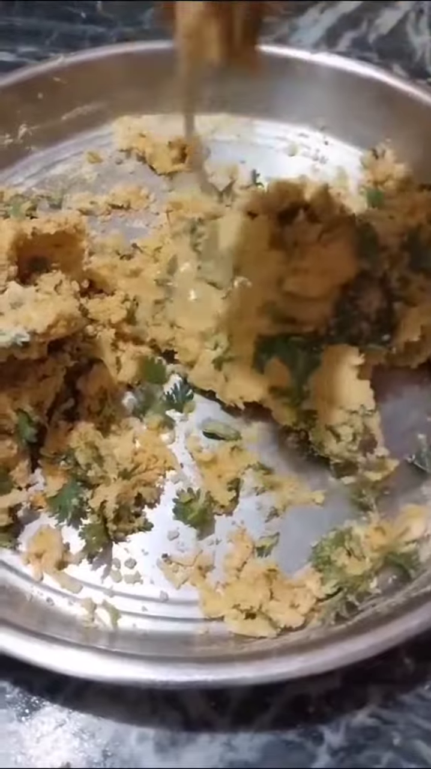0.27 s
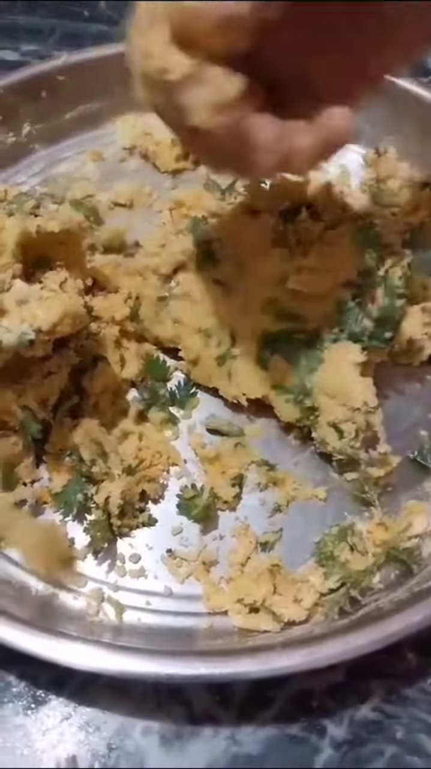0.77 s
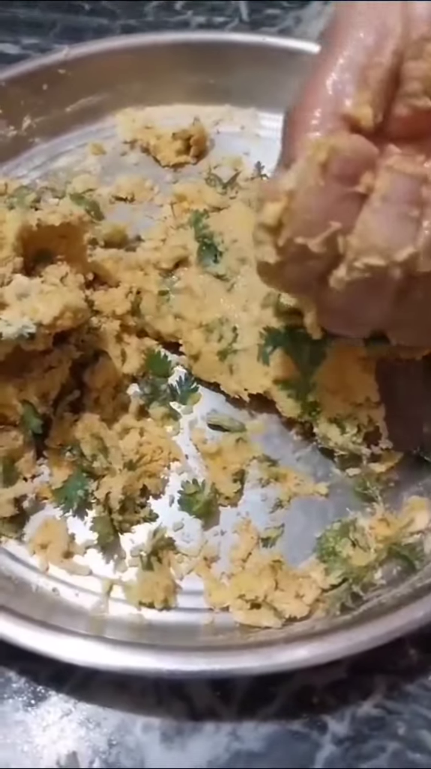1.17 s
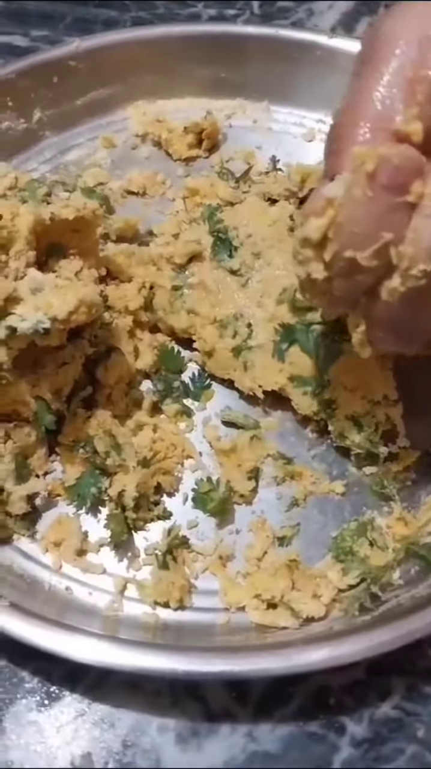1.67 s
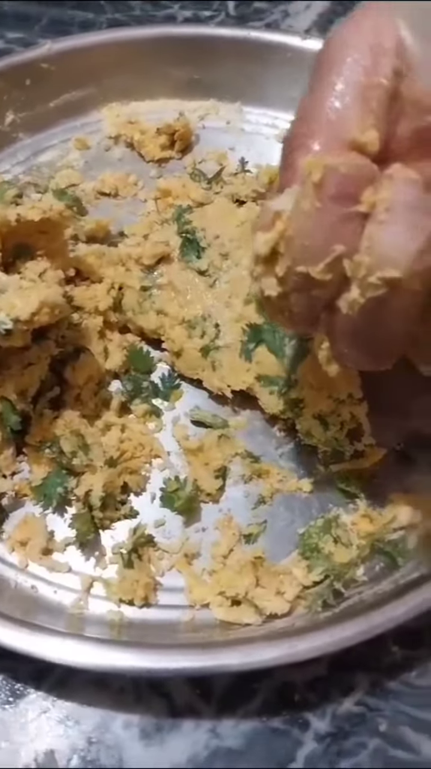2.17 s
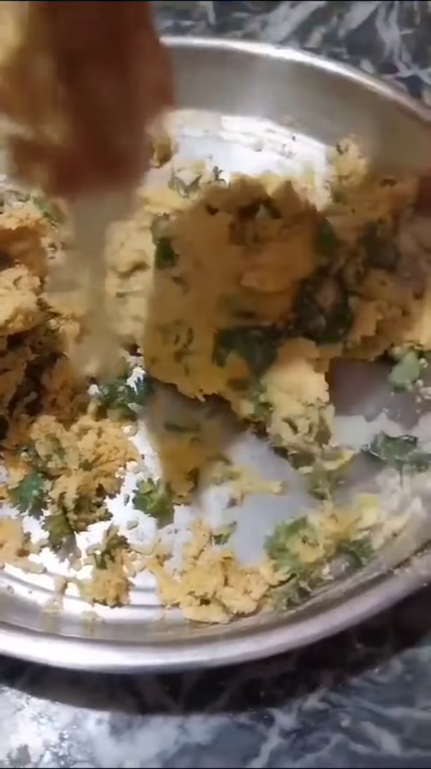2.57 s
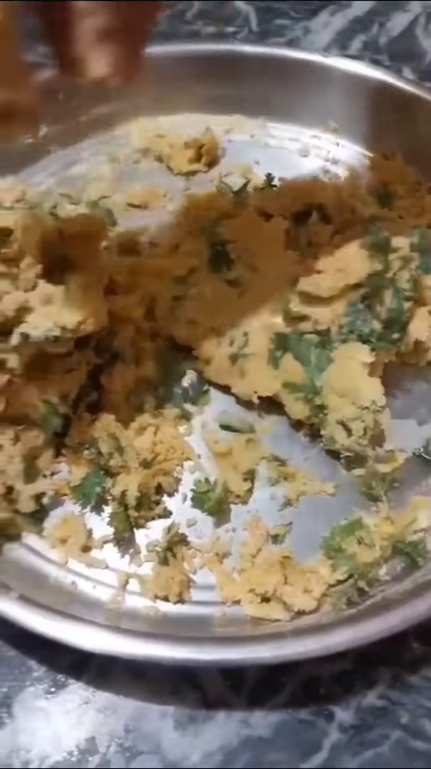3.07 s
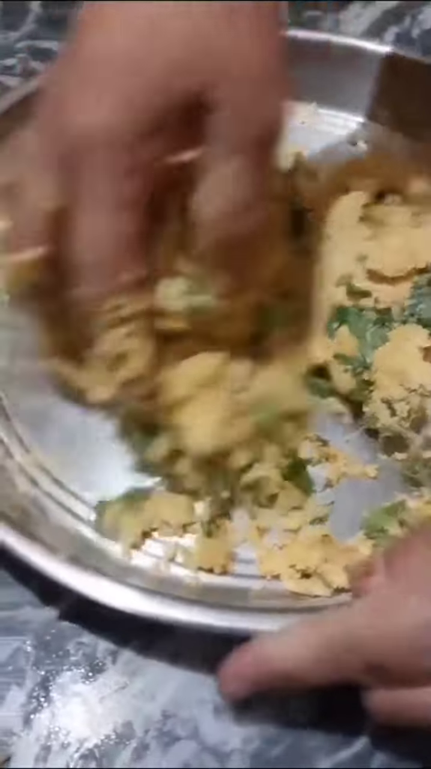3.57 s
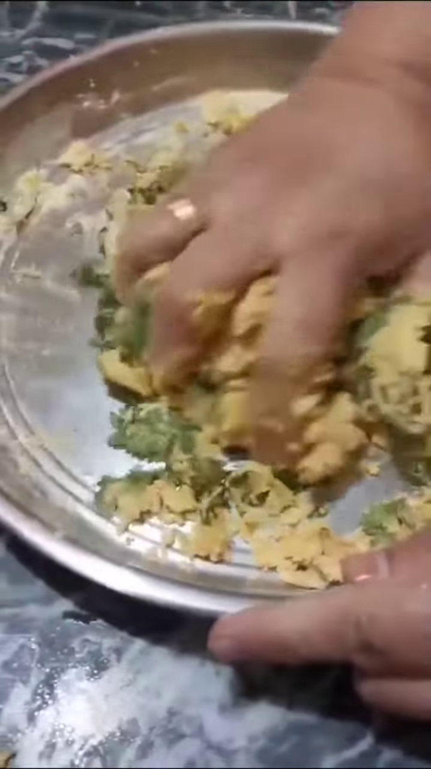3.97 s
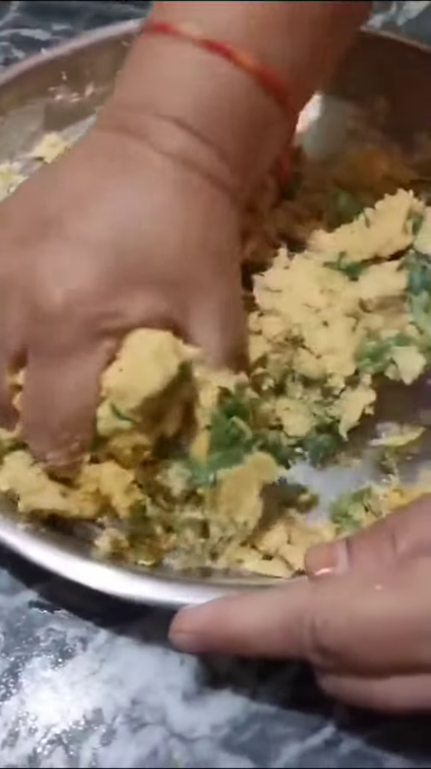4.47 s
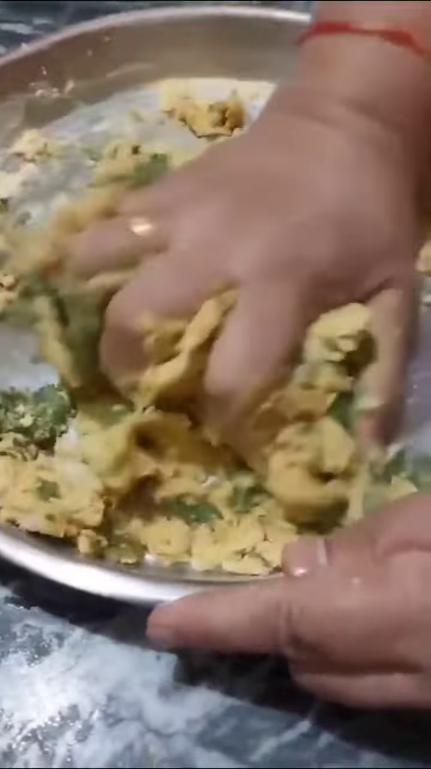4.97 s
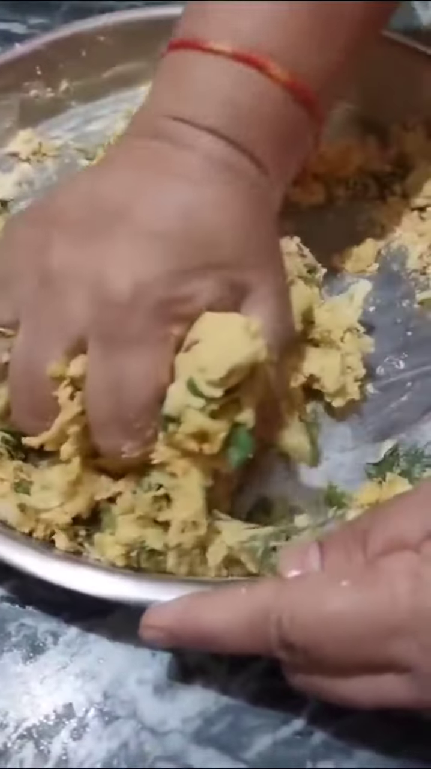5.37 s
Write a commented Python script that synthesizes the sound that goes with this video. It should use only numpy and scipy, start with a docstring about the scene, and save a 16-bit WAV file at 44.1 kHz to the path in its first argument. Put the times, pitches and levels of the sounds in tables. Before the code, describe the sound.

Grainy dough mixing on a metal plate: soft crunches, a thud with small rattles, a bright scrape, then kneading, above a steady appliance hum.

```python
"""In a kitchen, a hand works a crumbly flour dough on a steel plate that stands on a stone counter.
Strokes are grainy noise: the dough rubs, crumbs break and crackle, and a brisk scrape stirs the steel.
The plate is a set of ringing modes: it takes one hard knock, judders, rocks and is bumped softly.
A motor hums and whines as multiples of a wandering turning speed, over steady whirr and room air.
A faint far squeal and a short faint whistle are thin, fluttering tones."""
import sys
import numpy as np
from scipy import signal
from scipy.fft import rfft, irfft, next_fast_len
from scipy.io import wavfile
from scipy.ndimage import uniform_filter1d

SR = 44100
rng = np.random.default_rng(int(sys.argv[2]) if len(sys.argv) > 2 else 0)


def unload_audio(sound):
    """Save the sound as a 16-bit wav file, at the path given as the first command line argument."""
    columns = np.transpose(np.atleast_2d(sound))
    # keep every value between -1 and 1, then stretch to whole-number steps
    steps = np.round(np.clip(columns, -1, 1) * 32767)
    wavfile.write(sys.argv[1], SR, steps.astype(np.int16))


N = 247401
TIME = np.arange(N) / SR


def from_db(db):
    """Turn decibels into gain."""
    return 10 ** (np.asarray(db) / 20)


def rms_one(x):
    """Scale a sound to an rms level of 1."""
    return x / np.sqrt(np.mean(x ** 2) + 1e-20)


def in_time(rows):
    """Read each column of a table at every sample, with straight lines between the rows."""
    seconds, *columns = np.transpose(rows)
    return [np.interp(TIME, seconds, column) for column in columns]


def at_hz(points, hz):
    """Read a table of frequencies on a logarithmic frequency axis."""
    table = np.array(points)
    return np.interp(np.log(hz + 1), np.log(table[:, 0]), table[:, 1])


def pan(db):
    """Left and right gains for a level difference; above 0 dB the left is louder."""
    return from_db(np.array([[db], [-db]]) / 2)


def drift(rate_hz):
    """Slow random wandering with rms 1: noise smoothed twice, with poles at the given rate."""
    step = 40  # samples between the computed points
    pole = np.exp(-2 * np.pi * step * rate_hz / SR)
    noise = rng.standard_normal(N // step + 2002)
    slow = signal.lfilter([1], [1, -2 * pole, pole * pole], noise)[2000:]  # skip the filter's start
    return np.interp(np.arange(N) / step, np.arange(len(slow)), rms_one(slow))


# how alike the noise is at the two ears: (frequency [Hz], likeness [0-1])
LIKENESS = [(30, 1), (120, 0.34), (260, 0.4), (500, 0.3), (1000, 0), (2000, 0), (4000, 0), (8000, 1),
            (13000, 0.92)]


def coloured(spectrum, texture=1):
    """Stereo noise, shaped in time by a texture and then by a smooth spectrum, with rms 1."""
    size = next_fast_len(N)
    hz = np.arange(size // 2 + 1) * SR / size
    mid, side = rfft(rng.standard_normal((2, N)) * texture, size)
    alike = np.minimum(at_hz(LIKENESS, hz), .99)
    both = np.sqrt(1 + alike) * mid + np.sqrt(1 - alike) * side * [[1], [-1]]
    return rms_one(irfft(both * from_db(at_hz(spectrum, hz)), size)[:, :N])


def resonate(x, hz, width_hz):
    """Pass a sound through one resonance whose gain at the top is 1."""
    return signal.lfilter(*signal.iirpeak(hz, hz / width_hz, fs=SR), x)


def add(track, s, sound):
    """Mix a sound into a track at a time in seconds."""
    start = int(s * SR)
    track[..., start:start + sound.shape[-1]] += sound[..., :N - start]


def gate(start, length, attack_s, release_db_per_s):
    """An envelope that rises, holds and dies away."""
    age = TIME - start
    return np.clip(age / attack_s, 0, 1) * from_db(-release_db_per_s * np.maximum(age - length, 0))


def grains(per_s, spread_db, grain_s, smooth_share, clump_db):
    """Tiny fractures of uneven size come in clumps over a smooth sliding hiss."""
    born = rng.random(N) < per_s * from_db(clump_db * drift(25)) / SR
    sizes = from_db(spread_db * np.minimum(rng.exponential(1, N), 4))
    fading = [1, -np.exp(-1 / (grain_s * SR))]
    power = signal.lfilter([1], fading, born * sizes ** 2 + 1e-18)
    return np.sqrt(power / power.mean() + smooth_share)


def shifting(x, patchy_db):
    """The contact keeps changing, so each third of an octave swells and fades on its own."""
    size = next_fast_len(N)
    hz = np.arange(size // 2 + 1) * SR / size
    thirds = 3 * np.log2(np.clip(hz, 1000, 16000) / 1000)
    spectrum, out = rfft(x, size), 0
    for band in range(13):
        gain = from_db(patchy_db * drift(13))
        share = np.maximum(0, 1 - np.abs(thirds - band))
        out = out + rms_one(gain) * irfft(spectrum * share, size)[:, :N]
    return out


def thin_tone(phase):
    """A tone that flutters in level and wavers in phase, differently at each ear."""
    waver = .7 * drift(18) + .5 * np.array([drift(12), drift(12)])
    return from_db(1.5 * drift(25)) * np.sin(phase + waver)


def struck(modes, pitch=1):
    """Modes ring after a soft contact, each a little different on every blow."""
    t = TIME[:SR // 3]
    rings = 0
    for hz, db, t60 in modes:
        gain = from_db(db + rng.normal(0, 2.2) - 60 * t / t60)
        rings = rings + gain * np.sin(2 * np.pi * pitch * hz * rng.normal(1, .01) * t)
    return rings * (1 - np.exp(-t / .0052))


def kitchen(x, t60_s):
    """A short diffuse echo tail, different at each ear, dulled by the walls."""
    t = TIME[:SR // 2]
    tail = rng.standard_normal((2, len(t))) * from_db(-60 * t / t60_s) * (t > .004)
    tail = signal.sosfilt(signal.butter(1, 6000, fs=SR, output="sos"), tail)
    return signal.fftconvolve(x, tail / np.sqrt(np.sum(tail ** 2) / 2), axes=1)[:, :N]


# motor speed: (time [s], speed [turns/s])
SPEED = [(0, 25), (.4, 24.2), (.7, 24.3), (1.05, 25.4), (1.35, 25.6), (1.94, 26.4), (2.6, 26.3),
         (3.3, 26.8), (4.5, 25.4), (5.61, 25.6)]
# the hum's two main lines, in two parts, the sixth before a lift:
# (time [s], level of 5th order [dB], level of 6th order [dB])
HUM = [
    [(0.0, -54.5, -45.5), (0.18, -49.5, -42.5), (0.91, -38.5, -47.5), (1.9, -37, -54.5), (2.02, -36, -50.5),
     (2.3, -37.5, -57), (2.42, -36, -91), (2.55, -37, -57)],
    [(2.95, -38, -56), (3.23, -36, -42.5), (3.9, -59, -65), (4.28, -52.5, -63), (4.45, -41.5, -67),
     (4.68, -39.5, -52), (5.35, -46.5, -59.5), (5.61, -49, -48)],
]
# shared level of the weaker orders: (time [s], level [dB])
OVERTONES = [(0, -41.5), (.9, -40), (1.6, -35), (2.5, -37), (3.2, -34), (3.9, -54.5), (4.7, -45.5),
             (5.61, -50)]
# the casing's response to the weaker orders: (frequency [Hz], gain on their shared level [dB])
CASING = [(52, -31.5), (76, -22.5), (103, -27), (178, -13), (186, -11.5), (208, -17), (236, -17.5),
          (262, -35), (290, -24.5), (318, -31.5), (340, -18.5), (365, -39.5)]
# the thin whine: (time [s], level of 36th order [dB], level of 40th order [dB])
WHINE = [(0, -79, -74), (.9, -72, -76), (1.3, -72, -77), (1.699, -68.5, -69), (1.95, -74.5, -79.5),
         (2.3, -68, -83), (2.7, -83.5, -88), (3.0, -62, -79), (3.15, -80, -85), (3.7, -99, -104)]
# spectra of the low noise under the hum: (frequency [Hz], relative level [dB])
DRONE = [(60, -6.5), (110, 15.5), (160, 7.5), (210, 11), (270, 8.5), (335, 2), (400, -22), (510, -5.5),
         (700, -53)]
RUMBLE = [(15, -43), (30, 27), (50, 40), (80, 40.5), (120, 41.5), (250, -35.5)]


def motor():
    """Neighbouring orders (multiples) of the turning speed beat once a turn, so the hum throbs."""
    speed, = in_time(SPEED)
    fifth_db, sixth_db = in_time(np.vstack(HUM))
    unsteady = np.interp(TIME, [2.7, 3.6], [.04, .45])  # the hum wavers more later on
    turn = 2 * np.pi * np.cumsum(speed) / SR
    fifth = from_db(fifth_db + 6.5 * unsteady * drift(15.4))
    sixth = from_db(sixth_db + 3.5 + 5 * unsteady * drift(12))
    hum = fifth * np.cos(5 * turn + unsteady * drift(6))
    hum += sixth * np.cos(6 * turn + unsteady * drift(6))
    overtones = from_db(in_time(OVERTONES)[0])
    for order in (2, 3, 4, 7, 8, 9, 10, 11, 12, 13, 14):
        gain = overtones * from_db(at_hz(CASING, order * speed) + 1.5 * drift(3))
        # the casing delays each order differently, which keeps the hum round instead of buzzy
        lag = order ** 2 * np.pi / 7 + .25 * drift(5)
        hum += gain * np.cos(order * turn + lag + 2 * unsteady * drift(3))
    whine = 0
    for order, db in zip((36, 40), in_time(WHINE)):
        whine = whine + from_db(db + 2 * drift(4)) * thin_tone(order * turn + 3 * drift(1.5))
    # the drone is -54 dB when the main lines are at -43 dB, and shares part of their swing
    drone_gain = from_db(-54) * (np.hypot(fifth, sixth) / from_db(-43)) ** .15
    drone = drone_gain * (coloured(DRONE) + from_db(-6.5) * coloured(RUMBLE))
    return np.sqrt(2) * (hum + whine) + drone


# motor whirr in the casing, before the sink: (frequency [Hz], width [Hz], level [dB])
WHIRR = [(945, 120, -79), (2500, 500, -75), (5100, 300, -80)]
# spectrum of the room air: (frequency [Hz], relative level [dB])
AIR = [(240, -3), (440, 16.5), (600, 5), (800, 4.5), (1300, -9.5), (2000, -21), (2700, 0), (3100, -8.5),
       (4900, -11.5), (5700, -39), (7800, -16), (8700, -32), (15500, -38.5)]


def background():
    """The motor's whirr is noise in broad resonances, over the noise of the room air."""
    whirr = 0
    for hz, width, db in WHIRR:
        noise = rng.standard_normal((2, N))
        whirr = whirr + from_db(db) * rms_one(resonate(resonate(noise, hz, width), hz, width))
    sink_db = np.interp(TIME, [3.2, 3.7], [0, -5])
    return from_db(sink_db) * (whirr + from_db(-64.5) * coloured(AIR))


# a faint, far squeal: (time [s], pitch [Hz], level [dB])
SQUEAL = [(0, 652, -74), (.05, 660, -68), (.14, 672, -66), (.19, 676, -57), (.228, 672, -56.5),
          (.27, 674, -55), (.3, 672, -55.5), (.35, 666, -71.5), (.47, 671, -71), (.65, 665, -80)]
# its partials: (ratio to the pitch [1], level [dB])
SQUEAL_PARTIALS = [(1.001, -14.5), (1.341, -10.5), (2, 0), (3, -7), (3.999, -3), (6, -10)]


def squeal():
    """The partials share a gliding pitch, waver in level on their own and leave an echo."""
    hz, level_db = in_time(SQUEAL)
    phase = 2 * np.pi * np.cumsum(hz) / SR
    tone = sum(from_db(db + 2 * drift(14)) * thin_tone(ratio * phase) for ratio, db in SQUEAL_PARTIALS)
    direct = from_db(level_db) * (TIME < SQUEAL[-1][0]) * tone
    return direct + from_db(-4.5) * kitchen(direct, t60_s=.32)


# strokes of the hand in the dough:
# (start [s], length [s], rub on steel [dB], crunch [dB], fine crumbs [dB])
STROKES = [(-0.007, 0.39, -59, -65.5, -72), (0.42, 0.23, -65.5, -69, -67.5), (0.527, 0.025, -69, -60, -58),
           (0.846, 0.2, -63.5, -72.5, -88), (2.385, 0.023, -64, -54, -61.5),
           (2.542, 0.13, -66.5, -58, -63.5), (2.712, 0.079, -48.5, -51, -64.5),
           (2.814, 0.023, -72, -53.5, -59.5), (2.864, 0.17, -66.5, -68.5, -79),
           (3.262, 0.49, -71, -61.5, -67), (3.416, 0.092, -84, -51.5, -51), (3.789, 0.36, -70, -58, -58),
           (4.175, 0.16, -77, -60, -58.5), (4.286, 0.14, -60, -73, -75), (4.444, 0.14, -64.5, -57, -54),
           (4.602, 0.58, -98, -62.5, -59), (4.984, 0.067, -85, -53.5, -56.5),
           (5.215, 0.27, -63, -71.5, -70.5), (5.368, 0.21, -63, -55.5, -55),
           (5.491, 0.089, -75, -57.5, -49.5)]
# spectra of the three layers: (frequency [Hz], relative level [dB])
RUB = [(350, -63.5), (600, 8.5), (900, -4.5), (1250, 6), (1850, 4.5), (2450, 5.5), (3100, -27)]
CRUNCH = [(1200, -26), (1900, -8.5), (2400, 0.5), (2850, -1.5), (3400, -1), (4400, 0), (5700, -4),
          (7000, -1.5), (9500, -23)]
CRUMBS = [(5500, -15), (7800, 1.5), (9500, -4), (11000, 2), (12400, 3), (13600, 0), (15500, -3.5)]


def dough():
    """With each stroke the lump rubs on the steel, coarse crumbs break and fine ones crackle."""
    # under the strokes the fingers keep squeezing lightly: rub, crunch, fine crumbs [dB]
    power = from_db([[-68.5], [-75], [-92]]) ** 2
    for start, length, *levels_db in STROKES:
        attack_s = .035 + .075 * length  # long strokes swell more slowly
        stroke = gate(start, length, attack_s, release_db_per_s=219)
        power = power + np.outer(from_db(levels_db), stroke) ** 2
    rub_gain, crunch_gain, crumbs_gain = np.sqrt(power)
    rubbing = grains(per_s=140, spread_db=-15.5, grain_s=.01, smooth_share=.4, clump_db=.5)
    breaking = grains(per_s=560, spread_db=2, grain_s=.0034, smooth_share=.23, clump_db=3.5)
    crackle = grains(per_s=900, spread_db=3, grain_s=.0005, smooth_share=.6, clump_db=3.5)
    rub = rub_gain * coloured(RUB, rubbing)
    crunch = crunch_gain * coloured(CRUNCH, breaking)
    crumbs = crumbs_gain * coloured(CRUMBS, crackle)
    contact = (rub + crunch) * pan(db=-4.5) + crumbs * pan(db=-2.5)
    return shifting(contact, patchy_db=2.6)


# fingers and crumbs tick on the steel:
# (time [s], peak before a common cut [dB], centre [Hz], left over right [dB])
TICKS = [(0.0562, -27.5, 1600, 9), (2.4112, -28.5, 2950, -9), (2.552, -32.5, 7140, -3.5),
         (2.5782, -36.5, 3740, -12), (2.612, -28.5, 7593, -3), (2.6557, -28, 2300, -19.5),
         (2.716, -37.5, 1380, -23), (3.237, -44, 1090, -9), (4, -28, 4200, -11), (4.003, -29.5, 4200, -14),
         (4.02, -19, 12500, -17), (4.0592, -8, 12300, -22), (4.086, -10, 11850, -23),
         (4.122, 3, 12900, -10), (4.1252, -4, 12700, -20), (4.1377, -6, 12600, -5), (4.153, -18.5, 5203, 2),
         (4.168, -19.5, 5230, 0), (4.3298, -23.5, 2340, -6), (4.997, -29, 2400, -4),
         (5.22, -42.5, 1630, -5)]


def ticks():
    """A sharp contact and a short rustle in one broad resonance; low ticks last longer."""
    out, t = np.zeros((2, N)), TIME[:SR // 6]
    for s, peak_db, hz, side_db in TICKS:
        cycles = t * hz
        shape = np.exp(-cycles / 5) + from_db(-15) * np.exp(-cycles / 45)
        shared, own = rng.standard_normal(len(t)), rng.standard_normal((2, len(t)))
        contact = (shared + .59 * own) * shape
        tick = resonate(resonate(contact, hz, hz * .59), hz, hz * .76)
        add(out, s, from_db(peak_db - 8.5) * tick / np.abs(tick).max() * pan(db=side_db))
    return out


# clumps of dough crumble onto the steel:
# (time [s], length [s], level [dB], centre [Hz], spread to each side [octaves], left over right [dB])
CRUMBLES = [(0.06, 0.018, -55, 1440, 0.45, -3), (0.556, 0.012, -65, 2106, .3, -11),
            (2.41, 0.018, -51, 2630, 0.17, -4), (2.411, 0.011, -53, 6740, 0.086, 5),
            (2.458, .01, -59, 4640, 0.13, -2), (2.71, 0.008, -50.5, 2710, 0.8, -9),
            (2.754, 0.0082, -49.5, 4940, 0.15, -7), (2.766, 0.018, -48, 3000, 0.39, -13),
            (2.797, 0.0044, -54, 3350, 0.72, -7), (2.821, 0.013, -46.5, 3260, 0.61, -5),
            (4.349, .065, -60.5, 1390, 0.46, -1), (4.484, 0.035, -56.5, 5530, 0.42, 0),
            (4.773, .012, -62, 4605, 0.34, 2), (5.082, 0.021, -48, 6250, 0.21, -2)]


def crumbles(count):
    """A clump breaks in a quick run of tiny cracks, which ring briefly at several pitches."""
    out, t = np.zeros((2, N)), TIME[:SR // 8]
    cracks_per_s = 1400  # shared among the pitches
    for s, length, level_db, centre_hz, octaves, side_db in CRUMBLES:
        burst = 0
        places = np.linspace(-1, 1, count) + rng.normal(0, .15, count)
        for hz in centre_hz * 2 ** (octaves * places):
            happens = rng.random(len(t)) < cracks_per_s / count / SR
            cracks = happens * rng.standard_normal((2, len(t))) + 1e-18
            burst = burst + resonate(resonate(cracks, hz, hz * .13), hz, hz / 2) / np.sqrt(hz)
        fade = from_db(level_db - 800 * np.maximum(t - length, 0))  # falls 800 dB per s
        add(out, s, fade * rms_one(burst) * pan(db=side_db))
    return out


# the lump drags over the steel and the rub rises in pitch:
# (start [s], length [s], first pitch [Hz], last pitch [Hz], level [dB])
DRAGS = [(4.436, .16, 1503, 2400, -67), (4.84, 0.15, 2226, 3015, -63.5), (5.0, 0.11, 3330, 5580, -59),
         (5.231, 0.26, 1203, 2494, -61.5), (0.818, 0.159, 627, 694, -60.5), (5.439, 0.18, 3313, 4400, -62)]


def drags():
    """Each drag is a grainy band of friction that swells, fades and glides upward."""
    out = np.zeros((2, N))
    grit = grains(per_s=300, spread_db=2.2, grain_s=.002, smooth_share=.3, clump_db=2.5)
    for start, length, first_hz, last_hz, level_db in DRAGS:
        progress = np.clip(TIME[:SR // 2] / length, 0, 1)
        phase = 2 * np.pi * np.cumsum(first_hz * (last_hz / first_hz) ** progress) / SR
        lowpass = signal.butter(2, first_hz * .38, fs=SR, output="sos")
        a, b = signal.sosfilt(lowpass, rng.standard_normal((2, 2, len(phase))))
        # two slow noises on a cosine and a sine make a band around the gliding pitch
        band = rms_one(a * np.cos(phase) + b * np.sin(phase))
        add(out, start, from_db(level_db) * np.sin(np.pi * progress) * band)
    return out * rms_one(grit) * pan(db=-5)


# one faint whistle: (start [s], length [s], pitch [Hz], slide [Hz/s], level [dB])
WHISTLE = (0.9, 0.15, 2439, -330, -62)


def whistle():
    """A thin tone swells and fades while its pitch sags."""
    start, length, hz, slide, level_db = WHISTLE
    age = np.clip(TIME - start, 0, length)
    phase = 2 * np.pi * np.cumsum(hz + slide * age) / SR
    return from_db(level_db) * np.sin(np.pi * age / length) * thin_tone(phase)


# high plate modes, damped by the dough: (frequency [Hz], level [dB], time to fall 60 dB [s])
CLANK = [(649, 6.5, 0.021), (744, 1.5, 0.034), (988, -7, 0.074), (1047, -1, 0.055), (1215, -7, 0.11),
         (1470, -8.5, 0.11), (2570, 9.5, 0.014), (3160, -7, 0.026)]


def clank():
    """The steel's high modes reach each ear with different strengths."""
    return np.array([struck(CLANK), struck(CLANK)]) * pan(db=-3.5)


# plate knocks and rocks on the counter:
# (time [s], force [dB], body ring [dB], upper body ring [dB], body pitch [Hz])
KNOCKS = [(2.6564, -9.5, -47, -20, 237.2), (2.752, -27.5, -40, -54, 241), (2.768, -26.5, -44, -49, 240),
          (2.792, -32.5, -51, -52, 230), (2.837, -28, -32.5, -47, 250), (2.921, -36, -27.5, -38.5, 259),
          (3.014, -39, -32, -44, 244), (3.034, -32.5, -35.5, -50, 325), (3.149, -36, -28, -39, 275.9),
          (3.174, -43, -51, -47, 285), (3.235, -35, -33.5, -35.5, 253.8), (3.253, -42, -40, -58, 219),
          (3.32, -40, -36.5, -47.5, 307), (3.405, -43, -40, -58, 267), (3.5, -47, -37.5, -64, 297),
          (3.583, -47, -43, -72, 257.5), (3.662, -50, -39, -56, 247), (3.676, -48, -42, -51, 288.6)]
# low thud of the loaded plate: (frequency [Hz], time to fall 60 dB [s])
THUD = (186, .0245)
# body modes, whose pitch moves with the hand's load:
# (ratio to the body pitch [1], level [dB], time to fall 60 dB [s])
BODY = [(.87, -3.5, 0.07), (1, 9.5, 0.074), (1.17, -1, 0.075), (1.36, -6, 0.018)]
# upper body modes, damped by the dough, and the short punch of a hard blow:
# (frequency [Hz], level [dB], time to fall 60 dB [s])
UPPER_BODY = [(406, -17, 0.045), (508, 4, 0.083), (576, -1, 0.023)]
PUNCH = [(341, -1, 0.043), (393, -21, 0.045)]
# light taps on the rim ring only the clank modes: (time [s], level [dB])
RIM_TAPS = [(3.236, -54), (4.33, -34.5), (5.221, -51)]


def knocks():
    """The loaded plate swells into a low thud within two cycles, while its higher modes ring."""
    out, t = np.zeros((2, N)), TIME[:SR // 3]
    thud_hz, thud_t60 = THUD
    swell = t ** 1.6 * from_db(-60 * t / thud_t60)
    thud = swell / swell.max() * np.sin(2 * np.pi * thud_hz * t)
    for s, force_db, ring_db, upper_db, body_hz in KNOCKS:
        add(out, s, from_db(force_db + 6) * thud * pan(db=-1.5))
        add(out, s, from_db(ring_db) * struck(BODY, body_hz) * pan(db=-3))
        add(out, s, from_db(upper_db) * struck(UPPER_BODY) * pan(db=-9.5))
        add(out, s, from_db(force_db - 20) * clank())
        # the punch grows faster than the force, so soft knocks have hardly any
        add(out, s, from_db(1.77 * force_db + 11) * struck(PUNCH) * pan(db=2))
    for s, tap_db in RIM_TAPS:
        add(out, s, from_db(tap_db) * clank())
    # a small plate radiates no deep bass
    return signal.sosfilt(signal.butter(5, 105, "high", fs=SR, output="sos"), out)


# modes of the judder:
# (frequency [Hz], level while pushed [dB], level ringing on [dB], left over right [dB])
JUDDER = [(180.5, -15.5, -30.5, -0.5), (224, -34, -36.5, -3.5), (325, -44, -41, -1.5),
          (508, -40.5, -48, -9.5)]


def judder():
    """After the hard knock the pushed plate judders on the counter, stops quickly and rings on."""
    start_s, length_s, attack_s = 2.693, .037, .012
    pushed = gate(start_s, length_s, attack_s, release_db_per_s=948)
    ringing = gate(start_s, length_s, attack_s, release_db_per_s=69)
    out = 0
    for hz, pushed_db, ringing_db, side_db in JUDDER:
        unsteady = hz / 500  # the higher modes waver most
        flutter = from_db(3 * unsteady * drift(25))
        phase = 2 * np.pi * hz * (TIME - start_s) + .8 * unsteady * drift(25)
        level = from_db(pushed_db) * pushed + from_db(ringing_db) * ringing
        out = out + level * flutter * np.sin(phase) * pan(db=side_db)
    return out


# the brisk scrape bites, builds, catches and slips free:
# (time [s], hiss of the grit [dB], ring of the steel [dB])
SCRAPE = [(4.013, -78, -87), (4.02, -40, -43), (4.034, -41, -57), (4.043, -32, -59), (4.056, -30, -51),
          (4.084, -24, -37.5), (4.104, -22.5, -41), (4.112, -25, -43), (4.118, -29, -36.5),
          (4.123, -24.5, -59), (4.135, -25.5, -53), (4.168, -41, -45), (4.195, -52, -63), (4.3, -88, -95)]
# spectrum of the hiss: (frequency [Hz], relative level [dB])
SCRAPE_COLOUR = [(1500, -36), (3300, -15), (4800, -6.5), (5700, -17.5), (7400, -5.5), (9000, -11),
                 (10000, -8), (12400, 0), (14000, -6), (15800, -2.5)]
# resonances of the scraped steel: (frequency [Hz], width [Hz], relative level [dB])
SCRAPE_RING = [(640, 300, -12.5), (1060, 240, -8), (2220, 230, -7), (2710, 350, -8), (4680, 150, -10),
               (5150, 150, -3.5), (6430, 290, -4.5)]


def scrape():
    """Dry grit sticks and slips; coarser grains stir the steel's resonances in uneven bursts."""
    hiss_db, ring_db = in_time(SCRAPE)
    slips = grains(per_s=1900, spread_db=2.4, grain_s=.00025, smooth_share=.25, clump_db=1)
    jitter = from_db(1.7 * np.array([drift(120), drift(120)]))
    hiss = from_db(hiss_db) * jitter * coloured(SCRAPE_COLOUR, slips) * pan(db=-.5)
    ring = 0
    for hz, width, db in SCRAPE_RING:
        catches = grains(per_s=300, spread_db=2.5, grain_s=.0006, smooth_share=.04, clump_db=3)
        push = catches * rng.standard_normal((2, N))
        ring = ring + from_db(db) * rms_one(resonate(resonate(push, hz, width), hz, 2 * width))
    return hiss + from_db(ring_db) * ring * pan(db=-1)


KNEAD_START_S, KNEAD_END_S = 4.15, 5.3


def kneading():
    """The pressed lump rumbles unevenly on the plate."""
    push = gate(KNEAD_START_S, KNEAD_END_S - KNEAD_START_S, attack_s=.54, release_db_per_s=36)
    return from_db(-51.5) * push * coloured(DRONE, from_db(5.7 * drift(8.9)))


def bumps(count):
    """The kneaded lump softly bumps the plate's body at random moments, strengths and pitches."""
    out = np.zeros((2, N))
    for when, size, load in rng.random((count, 3)):
        gain = from_db(-49.5 + 10 * size)
        body_hz = 213 * 2 ** (.56 * (load - .5))
        add(out, KNEAD_START_S + when * (KNEAD_END_S - KNEAD_START_S), gain * struck(BODY, body_hz))
    return out


def scene():
    """Mix the plate close by with its echo, the motor and the room behind."""
    # the lump sticks for a moment as the scrape begins, silencing the contact sounds
    moving = 1.0 * ((TIME < 4.007) | (TIME > 4.017))
    sliding = uniform_filter1d(moving, size=SR // 500)
    bright = sliding * (dough() + scrape() + ticks()) + drags() + crumbles(count=10)
    low = knocks() + judder() + bumps(count=14) + kneading()
    echo = kitchen(from_db(-11.5) * bright + from_db(-21.5) * low, t60_s=.23)
    return bright + low + echo + motor() + squeal() + whistle() + background()


def record(dry):
    """Cut the top steeply above 15.8 kHz."""
    return signal.sosfilt(signal.ellip(12, .1, 80, 15800, fs=SR, output="sos"), dry)


dry = scene()
out = record(dry)
unload_audio(out)
```